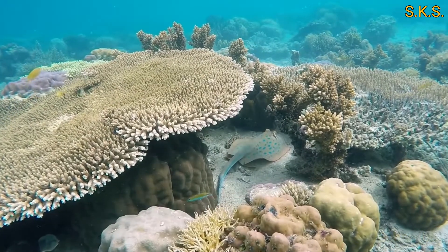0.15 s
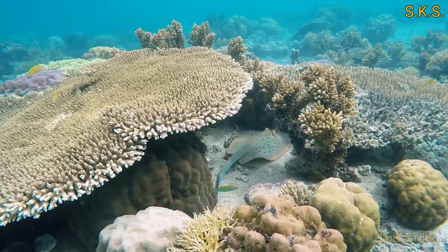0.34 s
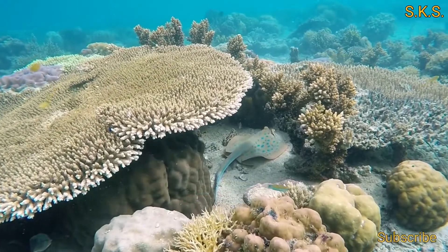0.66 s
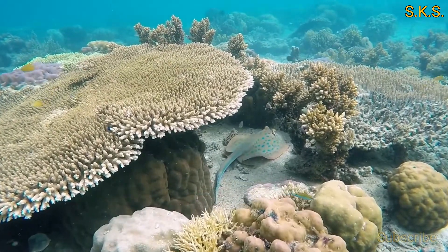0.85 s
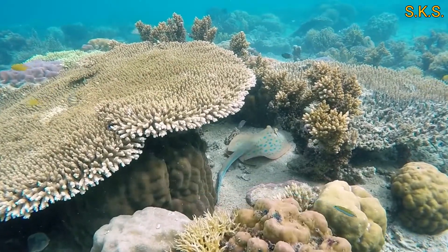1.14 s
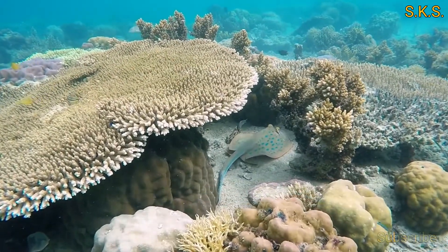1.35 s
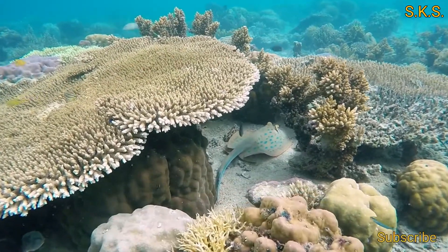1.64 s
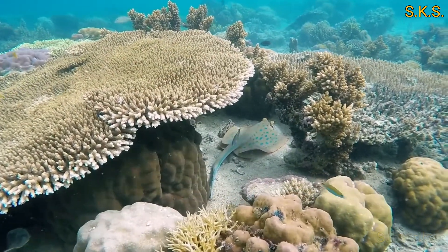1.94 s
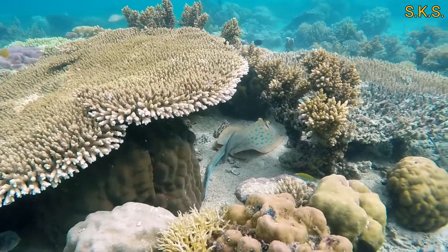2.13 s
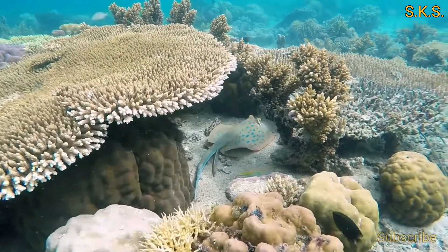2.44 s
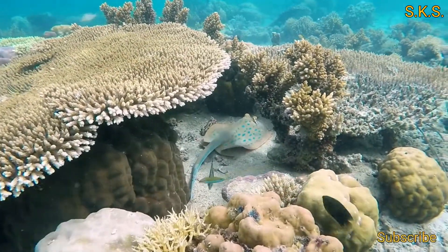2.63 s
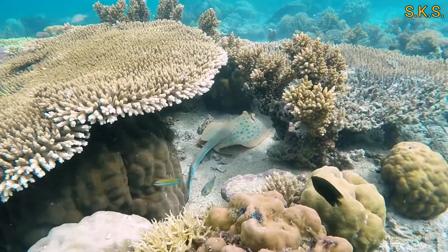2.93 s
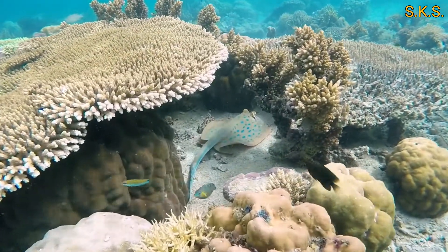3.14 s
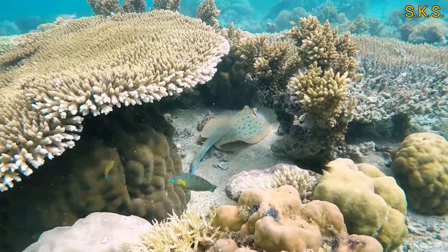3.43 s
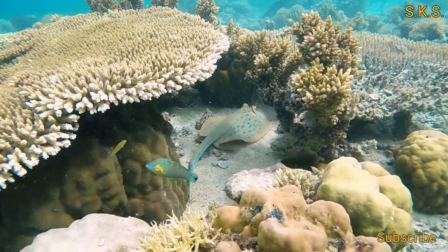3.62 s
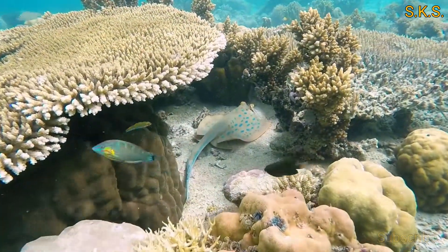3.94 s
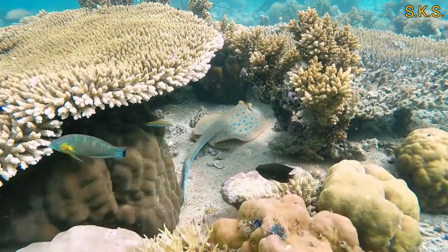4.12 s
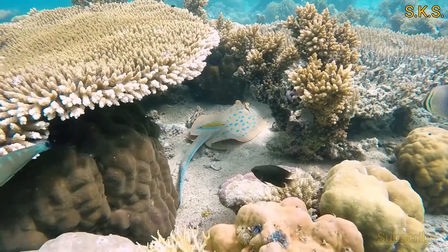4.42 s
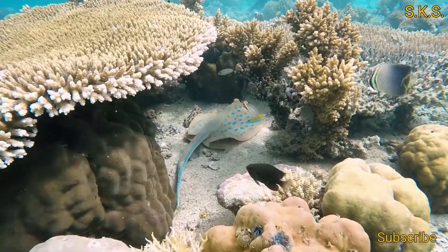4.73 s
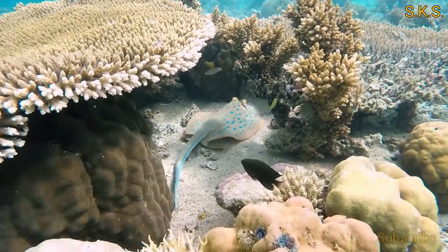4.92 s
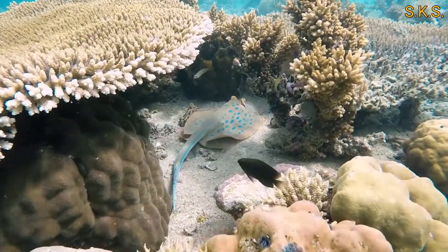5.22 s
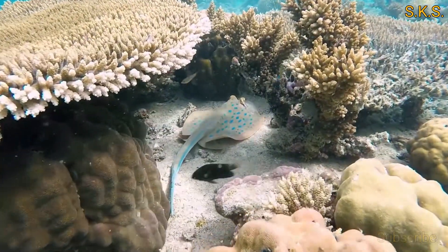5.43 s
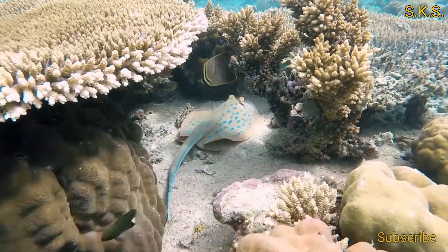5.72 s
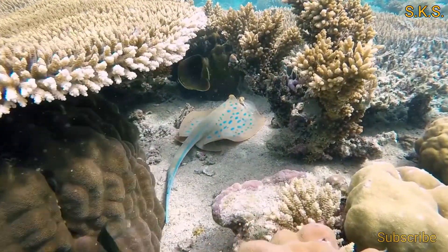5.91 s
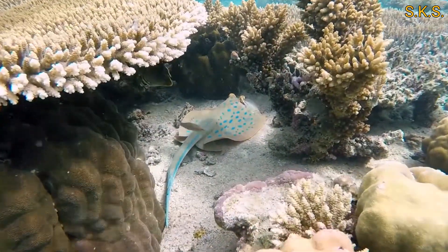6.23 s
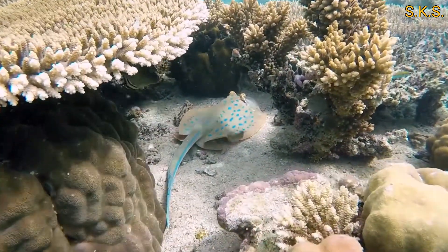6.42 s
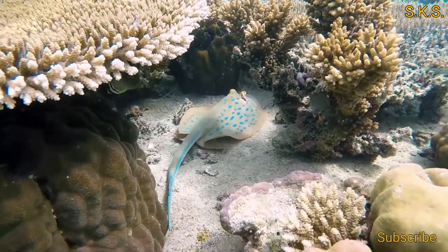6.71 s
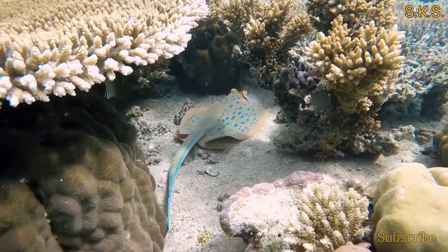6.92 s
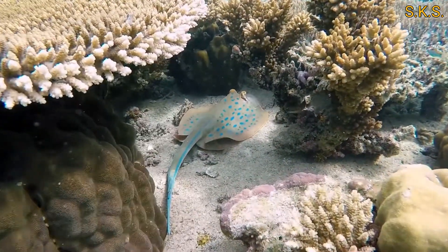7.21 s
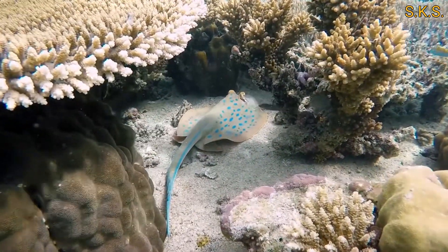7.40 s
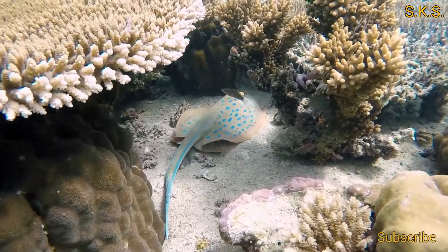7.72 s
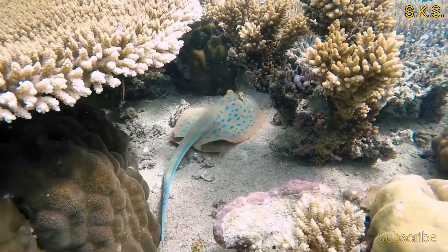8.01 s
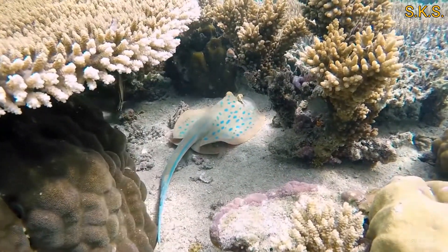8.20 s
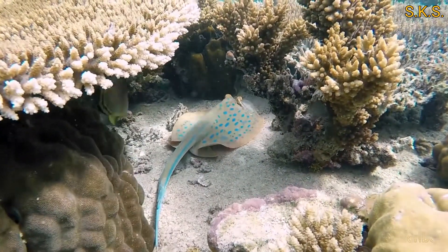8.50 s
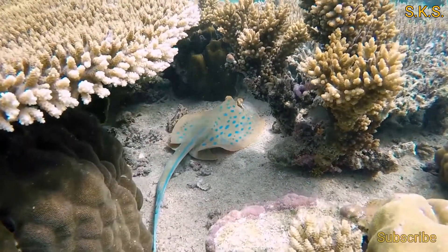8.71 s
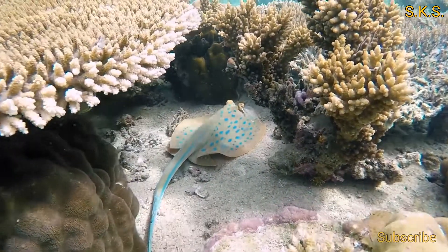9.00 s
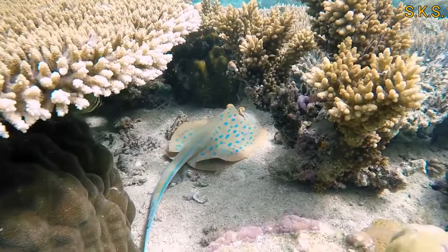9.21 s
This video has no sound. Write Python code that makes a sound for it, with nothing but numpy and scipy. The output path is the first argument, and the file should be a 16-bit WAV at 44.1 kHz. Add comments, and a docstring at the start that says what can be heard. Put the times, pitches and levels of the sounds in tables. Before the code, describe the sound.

Muffled underwater rumble with a few deep thumps, clusters of dull hollow taps, round bubble pops, and sharp dry snaps over faint crackling hiss.

```python
"""Water flows round a camera's watertight housing over a coral reef: filtered noise that surges, throbs and buffets.
It also thumps the case and shakes its mount, made from fading sine waves and random jolts.
Runs of hollow knocks ring the housing's modes, round pops are brief swelling tones, and flurries of bubbles
gurgle from random pulses. Sharp snaps, mostly shrimp, crackle as short shaped noise bursts over a faint hiss.
"""
import sys
import numpy as np
from scipy import signal
from scipy.fft import rfft, irfft, next_fast_len
from scipy.io import wavfile
from scipy.ndimage import uniform_filter1d

SR = 44100
rng = np.random.default_rng(int(sys.argv[2]) if len(sys.argv) > 2 else 0)


def master_out(mix):
    """Clip the mix to full scale and print it as 16-bit PCM to the path in sys.argv[1]."""
    frames = np.transpose(np.atleast_2d(mix))
    ceiling = np.clip(frames, -1, 1)
    pcm = np.round(ceiling * 32767).astype(np.int16)
    wavfile.write(sys.argv[1], SR, pcm)


N = 412335
T = np.arange(N) / SR  # time of every sample [s]

# Levels in the tables are relative: the functions trim many of them. A t60 is the time to fade by 60 dB.
# Water flowing round the case: (time [s], slow surge level [dB], throb level [dB])
WATER_FLOW = [(0.0, -37.5, -38), (0.5, -32.5, -34.5), (1.6, -25, -39.5), (1.8, -32.5, -43),
              (2.0, -23, -40.5), (2.7, -35.5, -43.5), (3.2, -31, -45.5), (3.4, -38.5, -35),
              (3.6, -37, -39.5), (4.7, -41, -41), (5.4, -35.5, -51.5), (5.7, -44.5, -44.5),
              (6.1, -45.5, -39), (6.4, -38, -47), (6.5, -37.5, -41.5), (7.8, -40.5, -48), (8.0, -41.5, -44),
              (9.35, -35.5, -46.5)]
# Tone of the slow surge: (frequency [Hz], level [dB])
SURGE_TONE = [(8, -26), (16, 6.5), (30, 2), (42, -6), (55, -17.5), (120, -34.5), (300, -69), (700, -140)]
# Tone of the throb of the case: (frequency [Hz], level [dB])
THROB_TONE = [(25, -29), (44, -2), (60, 1), (67, -4), (80, -22.5), (120, -26.5), (190, -41.5), (300, -63),
              (700, -140)]
# Slow thumps of water on the case:
# (time [s], pitch [Hz], level [dB], t60 [s], blow on the mount [dB], spray level [dB], spray length [s])
WATER_THUMPS = [(1.5, 55, -3.5, 0.18, -41.5, -35.5, 0.0075), (1.679, 51.7, -4, 0.11, -33.5, -41, 0.01),
                (1.976, 33, -5.5, 0.28, -27, -45, .035), (6.836, 33.8, -21.5, 0.38, -69, -74, .02)]
# What rings in the camera's mount: (frequency [Hz], level [dB], t60 [s])
MOUNT_MODES = [(96, 4.5, 0.17), (149.7, 3, 0.29), (171, -11.5, 0.32), (230, -10.5, 0.67)]
# Water jostles the camera and its mount shudders: (start [s], length [s], level [dB])
MOUNT_SHUDDERS = [(0.027, .44, -57), (1.74, .075, -42), (1.819, .16, -48.5), (1.978, .15, -44.5),
                  (2.15, .12, -43)]
# Hollow knocks: (time [s], level [dB], low modes compared with high modes [dB])
KNOCK_TIMES = [(0.367, -31.5, -2), (0.431, -39, -1), (.857, -36.5, 4), (1.03, -36, -3), (1.099, -33, 1),
               (1.4943, -21, -6), (1.6742, -18.5, -14), (2.1754, -27, -7), (2.2646, -27.5, -3.5),
               (2.312, -29, 4), (2.369, -25.5, 0), (2.385, -29.5, -3), (2.4291, -26.5, 2),
               (2.491, -33.5, 15), (2.534, -29.5, 4), (2.569, -21.5, 7), (2.6027, -21, -3.5),
               (2.659, -28.5, 5), (2.709, -26.5, 5), (2.7473, -22, -0.5), (2.879, -38, 3),
               (2.9274, -21.5, -1.5), (2.976, -29, 3), (2.987, -27.5, 1), (3.034, -18, 3),
               (3.082, -28.5, 7), (3.114, -27, 7), (3.1333, -17.5, -1), (3.176, -22, -5.5),
               (3.2414, -21, 5.5), (3.3643, -22.5, -0.5), (3.412, -25.5, 6), (3.452, -31, 2),
               (3.494, -26, -1), (3.626, -40, -11), (3.643, -29.5, -4), (3.711, -28.5, -6),
               (3.764, -33.5, 3), (3.818, -37, 4), (3.866, -43, 0), (3.984, -31, -9.5), (5.218, -29.5, 12),
               (5.3358, -31, -1), (5.351, -32, -7), (5.597, -38.5, -6), (5.6339, -29, 10), (5.8024, -18, 2),
               (5.8611, -27, -10), (5.894, -38, 5), (6.0003, -25.5, 7), (6.059, -28.5, 3),
               (6.108, -27.5, 6), (6.166, -24, 2.5), (6.215, -35, 11), (6.2888, -17.5, 7), (6.334, -23, 4),
               (6.396, -31.5, 6), (6.553, -24.5, -6.5), (6.581, -24, -0.5), (6.745, -32, 5),
               (6.8886, -25, 13), (6.9118, -24.5, -1), (7.0811, -31, 25), (7.0984, -32, 2),
               (8.3918, -29.5, 20), (8.8, -30, 4), (8.851, -30, 6), (8.897, -33.5, 6), (9.0791, -18.5, 5),
               (9.1217, -19.5, -1), (9.1719, -21, 5.5), (9.215, -23, 1), (9.246, -36, 4),
               (9.289, -31.5, -1), (9.339, -24.5, 0)]
# What a knock rings in the housing: (frequency [Hz], level [dB], t60 [s])
HOUSING_MODES = [(296, -5, 0.02), (401.3, 6, 0.023), (603.3, 2, 0.041), (729.5, -9.5, 0.027),
                 (1073, -7.5, 0.016), (1460, -15, 0.038), (2110, -8.5, 0.034)]
# Short round pops: (time [s], level [dB], pitch [Hz])
POP_TIMES = [(0.413, -38, 615), (4.054, -30.5, 630), (4.753, -34, 646), (4.785, -22.5, 620),
             (5.413, -33.5, 602), (5.549, -33, 605), (6.783, -29, 637), (7.341, -17, 588),
             (7.494, -39, 475), (7.578, -18.5, 594), (7.691, -40, 490), (7.968, -23, 614),
             (8.663, -28, 604), (9.008, -26.5, 610)]
# Flurries of small bubbles: (start [s], length [s], gurgle level [dB], rasp of the tiniest bubbles [dB])
BUBBLE_FLURRIES = [(0.006, 0.37, -50.5, -59.5), (1.446, 0.72, -47.5, -62), (4.775, 0.6, -43, -60.5),
                   (7.957, 0.59, -46, -63.5)]
# Gulps of larger bubbles: (time [s], level [dB], length [s], pitch [Hz])
BUBBLE_GULPS = [(0.179, -41, 0.011, 615), (1.435, -40, 0.018, 637), (1.458, -33.5, 0.025, 680),
                (1.732, -38.5, 0.013, 580), (1.758, -32.5, 0.018, 594), (4.787, -40, 0.013, 644),
                (4.793, -30.5, 0.024, 654), (4.9, -37, 0.023, 603), (4.979, -43, 0.013, 554),
                (5.013, -39, 0.032, 592), (5.133, -29, 0.023, 534), (5.158, -32.5, 0.018, 583),
                (5.256, -49, 0.024, 513), (7.976, -36.5, 0.025, 630), (8.101, -36.5, 0.0095, 600)]
# Tone of the larger bubbles: (frequency [Hz], level [dB])
BUBBLE_TONE = [(53, -54), (90, -16.5), (139, -10.5), (210, -7.5), (432, -7), (583, 0), (718, -15.5),
               (834, -15.5), (954, -52), (1190, -26), (1560, -29), (2480, -75), (7040, -110)]
# Tone of the spray of tiny bubbles: (frequency [Hz], level [dB])
SPRAY_TONE = [(400, -27), (900, 2.5), (1250, -7), (2080, -1), (2250, -16), (2500, -2), (3500, -16.5),
              (7000, -43), (15000, -70)]
# Resonances of the case that colour the bubbles: (frequency [Hz], width [Hz], added ring [dB])
CASE_RINGS = [(607, 43, -3), (1200, 48, 2.5), (1553, 70, 5), (2035, 125, 8)]
# Treble resonances of the case: (frequency [Hz], width [Hz], added ring [dB])
CASE_TREBLE_RINGS = [(2006, 156, 8.5), (2473, 265, 7), (5620, 300, 1.5), (8270, 310, -1.5)]
# Sharp close snaps, mostly shrimp, with a tick of spray after a thump and the edge of a pop:
# (time [s], level [dB], centre [Hz], bright crack compared with the body [dB])
CLOSE_SNAPS = [(.067, -31, 1810, -16), (.3506, -29.5, 4200, -11), (.413, -21.5, 1900, -25),
               (.436, -27.5, 3350, -23), (.7168, -29, 3300, -11), (.7835, -20.5, 3680, -9.5),
               (1.0327, -26, 2250, -34), (1.093, -26, 3050, -16), (1.3265, -27.5, 3180, -26),
               (1.409, -31, 2700, -23), (1.5923, -26.5, 3520, -27), (1.6793, -25.5, 2600, -53),
               (1.9496, -28, 2500, -33), (1.988, -26.5, 2680, -26), (2.249, -16, 3770, -24),
               (2.5232, -32, 4300, -4), (2.6743, -26.5, 2750, -20), (2.7, -30.5, 2600, -26),
               (2.741, -12, 4130, -10), (3.1135, -27, 2270, -10.5), (3.7329, -21.5, 3120, -18.5),
               (4.008, -22, 3180, -17), (4.0131, -25, 2500, -15), (4.2062, -30, 4200, -12),
               (4.2197, -28, 3850, -18), (4.2414, -23.5, 3600, -16), (4.3005, -35.5, 2710, -47),
               (4.7545, -20.5, 2100, -20), (4.992, -23, 4230, -13), (5.236, -31.5, 2520, -17),
               (5.4136, -28, 3250, -20), (5.4241, -26, 2590, -13.5), (5.7772, -29, 3820, -18),
               (5.9457, -22.5, 3170, -24), (6.3184, -32, 3520, -25), (6.4228, -32, 2190, -47),
               (6.5601, -30.5, 3200, -23), (6.5716, -32, 3650, -28), (6.6083, -29, 3430, -19),
               (6.6936, -31, 2950, -28), (6.7252, -27, 3100, -36), (6.7845, -38, 1550, -33),
               (6.8678, -34.5, 4270, -37), (7.4475, -27.5, 4200, -19), (7.5957, -23.5, 3130, -15),
               (7.6138, -22.5, 3500, -27), (7.7214, -29, 2980, -20), (7.9971, -29, 4000, -17),
               (8.1214, -27.5, 2700, -17), (8.1693, -34.5, 2560, -33), (8.2926, -26.5, 2930, -18),
               (8.3988, -20.5, 4000, -17), (8.4576, -23, 3220, -22), (8.535, -47, 3900, 10),
               (8.6737, -32, 3780, -13), (8.6889, -24.5, 3380, -15), (8.8026, -19.5, 4300, -19),
               (8.9301, -28, 4150, -25), (9.2738, -31.5, 3070, -37), (9.288, -25, 3200, -29)]
# Tone of the whole crackling reef: (frequency [Hz], level [dB])
REEF_TONE = [(600, -40), (1000, -12.5), (1500, -5), (1750, -20), (2000, -9.5), (2250, -9.5), (2550, -3),
             (3200, -4.5), (3900, 2), (5600, -6), (7100, -10.5), (10000, -10.5), (15000, -37)]
# Tone of the soft hiss: (frequency [Hz], level [dB])
HISS_TONE = [(88, -43.5), (150, 3), (381, -5.5), (607, 0.5), (985, -16.5), (1730, -16.5), (2020, -20),
             (2230, -29.5), (2500, -15), (3160, -14), (3910, -11.5), (5650, -17), (7130, -21), (13800, -27),
             (15500, -39)]

FLURRY_ATTACK_S, FLURRY_RELEASE_S = 0.0064, 0.21
GURGLE_HZ = 592  # the usual pitch of a gulp
TOP_HZ = 15300  # highest frequency the camera passes


def undb(db):
    """Turn decibels into a gain."""
    return 10 ** (np.asarray(db) / 20)


def unit(x):
    """Scale a sound so its average strength (rms) is 1."""
    return x / np.sqrt(np.mean(x ** 2) + 1e-18)


def add(out, s, x):
    """Mix x into out, starting at time s in seconds."""
    i = int(np.clip(s * SR, 0, N - 1))
    out[i:i + len(x)] += x[:N - i]


def colour(x, points, peaks=()):
    """Filter with a smooth (Hz, dB) outline and (Hz, width, dB) resonances; nothing sounds before its cause."""
    size = next_fast_len(len(x) + SR // 2, True) * 2
    f = np.arange(size // 2 + 1) * SR / size + 1e-3
    hz, db = np.transpose(points)
    gain = undb(np.interp(np.log(f), np.log(hz), db))
    gain = gain * (1 + sum(undb(d) / (1 + (2 * (f - c) / w) ** 2) for c, w, d in peaks))
    # folding the cepstrum gives the minimum-phase filter with this gain
    cepstrum = irfft(np.log(gain))
    cepstrum[1:size // 2] *= 2
    cepstrum[size // 2 + 1:] = 0
    response = np.exp(rfft(cepstrum))
    return irfft(rfft(x, size) * response)[:len(x)]


def strike(modes, length):
    """Ring a struck object: fading sine waves from (Hz, dB, t60) modes, over length seconds."""
    t = T[:int(length * SR)]
    return sum(undb(db) * np.sin(2 * np.pi * hz * t) * np.exp(-np.log(1000) * t / t60)
               for hz, db, t60 in modes)


def soften(x, hz, order=2):
    """Low-pass filter: a soft push in place of a sharp one."""
    return signal.sosfilt(signal.butter(order, min(hz, .45 * SR), fs=SR, output="sos"), x)


def sharpen(x, hz, order):
    """High-pass filter: take away the low part."""
    return signal.sosfilt(signal.butter(order, hz, "high", fs=SR, output="sos"), x)


def walk(rate):
    """Wander at random: a new level every 1 / rate seconds, smoothed twice, rms 1."""
    k = int(SR / rate)
    steps = np.repeat(rng.standard_normal(N // k + 1), k)
    smooth = uniform_filter1d(uniform_filter1d(steps, k), k)
    return unit(smooth[:N])


def patter(per_s, spread_db):
    """Scatter single pulses of either sign and varied size at random times, rms 1."""
    hits = rng.random(N) < per_s / SR
    signs = rng.choice([-1, 1], N)
    sizes = undb(spread_db * rng.standard_normal(N))
    return unit(hits * signs * sizes)


def many_small(size, spread_db, top_db):
    """Turn a chance of 0..1 into dB from 0 to top_db, small values far more common."""
    return -spread_db * np.log(1 - size * (1 - np.exp(-top_db / spread_db)))


def hiss(level_db=-60.2, waver_db=1.93, body_db=-75, stirred_db=-64, stir_s=0.24, sizzle_db=-75):
    """Distant crackle merges into a hiss; water keeps the housing's modes astir, most where knocks crowd."""
    far = unit(colour(rng.standard_normal(N), HISS_TONE, CASE_TREBLE_RINGS))
    far = far * undb(level_db + waver_db * walk(13))
    body = unit(signal.fftconvolve(rng.standard_normal(N), strike(HOUSING_MODES, .07))[:N])
    sizzle = undb(sizzle_db) * rng.standard_normal(N)
    crowd = np.sqrt(sum(np.maximum(1 - np.abs(T - s) / stir_s, 0) for s, _, _ in KNOCK_TIMES))
    stir = undb(body_db) + undb(stirred_db) * crowd / crowd.max()
    return far + sizzle + body * stir * undb(6.8 * walk(25))


def snap(noise, hz, octaves, crack_s, tail_s, tail_db, pulse=0, rise_s=0.00062):
    """A sharp noise burst, peak 1: a shock pulse if close, a crack round its pitch, then a scattered tail."""
    t = T[:len(noise)]
    fade = np.exp(-t / crack_s) + undb(tail_db) * np.exp(-t / tail_s)
    crack = noise * (1 - np.exp(-t / rise_s)) * fade
    crack[0] = pulse
    # band-pass round hz, octaves wide
    f = np.fft.rfftfreq(2 * len(t), 1 / SR) + 1
    off = 1j * (f / hz - hz / f) / (2 * np.sinh(np.log(2) * octaves / 2))
    x = irfft(rfft(crack, 2 * len(t)) / (1 + np.sqrt(2) * off + off ** 2))[:len(t)]
    return x / np.abs(x).max()


def thin_ticks(level_db=-60, spread_db=6, top_db=18, pitch_hz=9000, count=300):
    """The smallest shrimp add hair-thin ticks, high-pitched and at random times."""
    out = np.zeros(N)
    for noise, (when, size, pitch) in zip(rng.standard_normal((count, SR // 100)), rng.random((count, 3))):
        db = level_db + many_small(size, spread_db, top_db)
        hz = pitch_hz * 2 ** (pitch - .5)
        tick = snap(noise, hz, octaves=1.9, crack_s=0.00008, tail_s=0.0044, tail_db=-25.5)
        add(out, when * N / SR, undb(db) * tick)
    return out


def far_shrimp(level_db=-58.5, spread_db=12.5, top_db=20, centre_hz=4900, range_octaves=3.37,
               narrow_octaves=0.42, wide_octaves=2.3, answer_share=.35, answer_s=.016, count=1300):
    """The reef crackles: many faint snaps of varied pitch, width and length; some answer the last in clusters."""
    out, s = np.zeros(N), 0
    chances = rng.random((count, 6))
    for noise, chance in zip(rng.standard_normal((count, SR // 60)), chances):
        when, size, pitch, width, length, answer = chance
        s = s + when * answer_s if answer < answer_share else when * N / SR
        db = many_small(size, spread_db, top_db)
        hz = centre_hz * 2 ** (range_octaves * (pitch - .5))
        octaves = narrow_octaves * (1 - width) + wide_octaves * width
        crack_s = 0.00092 * 2 ** (2 * length - 1)
        add(out, s, undb(db) * snap(noise, hz, octaves, crack_s, tail_s=0.0043, tail_db=-5.5))
    return undb(level_db) * unit(colour(out, REEF_TONE, CASE_TREBLE_RINGS))


def neighbours(level_db=-41.0, range_db=9, centre_hz=3800, range_octaves=0.8, top_db=-20, count=66):
    """Shrimp a little further off snap at loose intervals: rows with the columns of CLOSE_SNAPS."""
    rows = []
    for k, (when, size, pitch, dullness) in enumerate(rng.random((count, 4))):
        s = (k + 2 * when - .5) * N / SR / count
        db = level_db + range_db * (size - .5)
        hz = centre_hz * 2 ** (range_octaves * (pitch - .5))
        rows.append((s, db, hz, top_db * (.5 + dullness)))
    return rows


def close_snaps(level_db=-3, low_hz=1300, high_hz=6400, crack_db=1, crack_hz=7500, ring_db=-7, shock_db=11,
                widest_octaves=2.62, narrowing_db=20):
    """Sharp snaps, mostly shrimp: a body the case rounds off and a thin bright crack; dull ones ring narrower."""
    body, crack = np.zeros(N), np.zeros(N)
    rows = list(CLOSE_SNAPS) + neighbours()
    for (s, db, hz, top_db), noise in zip(rows, rng.standard_normal((len(rows), 2, SR // 50))):
        octaves = widest_octaves * 2 ** (min(top_db, 0) / narrowing_db)
        round_snap = snap(noise[0], hz, octaves, crack_s=0.001, tail_s=0.004, tail_db=-11.5,
                          pulse=undb(shock_db))
        bright_snap = snap(noise[1], 7770, octaves=0.91, crack_s=0.00055, tail_s=0.0021, tail_db=-12,
                           pulse=1.47)
        add(body, s, undb(db + level_db) * round_snap)
        add(crack, s, undb(db + top_db + crack_db) * bright_snap)
    rings = [(hz, width, db + ring_db) for hz, width, db in CASE_TREBLE_RINGS]
    body = colour(body, [(low_hz / 3, -30), (low_hz, 0), (high_hz, 0)], rings)
    return soften(body, high_hz, order=6) + sharpen(crack, min(crack_hz, .4 * SR), order=2)


def swell(flurries, lumpy_db):
    """Shape the loudness of flurries: each rises, holds and fades in lumps."""
    shape = 0
    for s, length, db in flurries:
        rise, fade = (T - s) / FLURRY_ATTACK_S, (s + length - T) / FLURRY_RELEASE_S
        shape = shape + undb(db) * np.clip(np.minimum(rise, fade), 0, 1)
    return shape * undb(lumpy_db * walk(45))


def burst(births, s, length, db):
    """Cut out a short stretch of patter and give it its own level."""
    return undb(db) * unit(births[int(s * SR):int((s + length) * SR)])


def ring_case(push, outline):
    """Bubble pulses take their tone from the outline and ring the case."""
    body = colour(signal.unit_impulse(SR // 10), outline, CASE_RINGS)
    return signal.fftconvolve(push, body / np.linalg.norm(body))[:len(push)]


def bubbles(gulp_spray_db=-21.5, spray_growth=0.9, full_db=-30, spray_lead_s=.004, gulp_db=1.45):
    """Bubbles pinch off and gurgle, each gulp at its own pitch; gulps and thumps also throw a gritty spray."""
    starts, lengths, gurgle_db, rasp_db = np.transpose(BUBBLE_FLURRIES)
    large, tiny = patter(per_s=1300, spread_db=3.0), patter(per_s=900, spread_db=1.5)
    gurgle = ring_case(large * swell(zip(starts, lengths, gurgle_db), lumpy_db=2.0), BUBBLE_TONE)
    spray = tiny * swell(zip(starts, lengths, rasp_db), lumpy_db=-2.0)
    for s, db, length, pitch in BUBBLE_GULPS:
        # only the lower part of the tone moves with the gulp's pitch
        outline = sorted((hz * (pitch / GURGLE_HZ if hz < 1.5 * GURGLE_HZ else 1), d) for hz, d in BUBBLE_TONE)
        gulp = np.pad(burst(large, s, length, db + gulp_db), (0, SR // 10))
        add(gurgle, s, ring_case(gulp, outline))
        spray_db = full_db + gulp_spray_db + spray_growth * (db - full_db)
        add(spray, s, burst(tiny, s, length, spray_db))
    for s, *_, db, length in WATER_THUMPS:
        add(spray, s - spray_lead_s, burst(large, s, length, db))
    return gurgle + ring_case(spray, SPRAY_TONE)


def reef_echo(x, wet_db, t60):
    """Coral and the surface scatter a faint tail back: fading noise is blended in."""
    t = T[:SR // 2]
    tail = rng.standard_normal(len(t)) * np.exp(-np.log(1000) * t / t60)
    return x + undb(wet_db) * signal.fftconvolve(x, tail / np.linalg.norm(tail))[:N]


def knock(low_db, chance, wall_hz=800, low_cut_hz=215, split_hz=500, lean=0.99, detune=0.031, scatter_db=3.0,
          leak_db=-18, leak_lean=0.47, rise_s=0.00088):
    """One soft blow on the housing, peak 1; it leans on the lower or the upper modes."""
    modes = []
    for (hz, d, t60), (a, b) in zip(HOUSING_MODES, chance):
        mode_db = d + scatter_db * b + lean * low_db * (hz < split_hz)
        modes.append((hz * (1 + detune * a), mode_db, t60))
    blow = strike(modes, .08)
    blow = blow * (1 - np.exp(-T[:len(blow)] / rise_s))
    blow = sharpen(blow, low_cut_hz, order=4)
    # the wall muffles steeply; only a trace of the upper modes leaks through
    band = signal.butter(3, [1.39 * wall_hz, 3.1 * wall_hz], "band", fs=SR, output="sos")
    leak = undb(leak_db - leak_lean * low_db) * signal.sosfilt(band, blow)
    x = soften(blow, wall_hz, order=10) + leak
    return x / np.abs(x).max()


def pops(level_db=-1.0, length_s=0.013, early=0.39, knock_db=-14):
    """A few cycles of a tone that swell quickly and stop, barely ringing the housing."""
    out, t = np.zeros(N), T[:int(length_s * SR)]
    rise_and_stop = np.sin(np.pi * (t / length_s) ** early) ** 2
    for (s, db, hz), chance in zip(POP_TIMES, rng.standard_normal((len(POP_TIMES), len(HOUSING_MODES), 2))):
        add(out, s, undb(db + level_db) * rise_and_stop * np.sin(2 * np.pi * hz * t))
        add(out, s, undb(db + knock_db) * knock(0, chance, leak_db=-7))
    return out


def knocks(level_db=-2.5, lead_s=0.001395, faint_db=-42, faint_spread_db=3, faint_within_s=.07,
           bounce_s=0.0063, bounce_db=-19, bounce_lean=1.0, bounce_spread_db=3,
           grit_db=-30.5, grit_spread_db=4, grit_hz=1350):
    """Each knock lands with a little grit and bounces once, bright ones most; fainter ones fall between."""
    out, count = np.zeros(N), len(KNOCK_TIMES)
    noises = rng.standard_normal((count, SR // 40))
    chances = rng.standard_normal((count, 4, len(HOUSING_MODES), 2))
    for (s, db, low_db), noise, (main, bounce, faint, free) in zip(KNOCK_TIMES, noises, chances):
        (delay, size), (lean, gap), (rebound, rough), (pitch, _) = free[:4]
        add(out, s - lead_s, undb(db + level_db) * knock(low_db, main))

        rebound_db = min(bounce_db - bounce_lean * low_db + bounce_spread_db * rebound, -8)
        rebound_s = s + bounce_s * 2 ** (0.395 * gap)
        add(out, rebound_s, undb(db + rebound_db) * knock(low_db, bounce))

        hz = grit_hz * 2 ** (.2 * pitch)
        grit = snap(noise, hz, octaves=0.73, crack_s=0.0039, tail_s=0.01, tail_db=4)
        add(out, s, undb(db + grit_db - .5 * max(low_db, 0) + grit_spread_db * rough) * grit)

        add(out, s + faint_within_s * delay, undb(faint_db + faint_spread_db * size) * knock(6 * lean, faint))
    return out


def shudder(jolts_per_s=110, spread_db=4, damping=0.23, tilt_db=14, reference_hz=150):
    """Small irregular jolts keep the mount's modes rumbling, their ringing shortened by the water."""
    gate = sum(undb(db) * (T > s) * (T < s + length) for s, length, db in MOUNT_SHUDDERS)
    # tilt_db per octave favours the higher modes
    modes = [(hz, db + tilt_db * np.log2(hz / reference_hz), damping * t60) for hz, db, t60 in MOUNT_MODES]
    ring = strike(modes, .3)
    jolts = patter(jolts_per_s, spread_db) * gate * undb(6.6 * walk(22.02))
    return soften(signal.fftconvolve(jolts, ring / np.linalg.norm(ring))[:N], 350, order=4)


def thumps(soft_hz=170, mount_soft_hz=400, rise_s=0.0056):
    """Heavy pushes of water build up, swing the case for a few cycles and set its mount humming."""
    swing, hum = np.zeros(N), np.zeros(N)
    for s, hz, db, t60, mount_db, *_ in WATER_THUMPS:
        build_up = 1 - np.exp(-T[:SR] / rise_s)
        add(swing, s, -strike([(hz, db, t60)], 1) * build_up)
        add(hum, s, undb(mount_db) * strike(MOUNT_MODES, 0.9))
    return soften(swing, soft_hz) + soften(hum, mount_soft_hz)


def flow(surge_db=1, throb_db=0, full_db=-29, steady_s=0.155, buffet_db=-25.5, buffet_hz=100, growth=1.3,
         waver_db=2.5):
    """Eddies press on the case: a deep surge and a throb; faster water adds small eddies that buffet higher up."""
    s, *levels = np.transpose(WATER_FLOW)
    slow_db, fast_db = (np.interp(T, s, db) for db in levels)
    buffet = unit(soften(rng.standard_normal(N), buffet_hz, order=4))
    out = buffet * undb(full_db + buffet_db + growth * (slow_db - full_db))
    for outline, db in (SURGE_TONE, slow_db + surge_db), (THROB_TONE, fast_db + throb_db):
        eddies = colour(rng.standard_normal(N), outline)
        # even out the noise so that it follows the level in the table
        strength = np.sqrt(uniform_filter1d(eddies ** 2, int(steady_s * SR)) + 1e-18)
        out = out + undb(db + waver_db * walk(7.8)) * eddies / strength
    return out


def scene():
    """Everything reaches the one microphone through the case."""
    snaps = close_snaps() + far_shrimp() + thin_ticks()
    taps = reef_echo(knocks(), wet_db=-24.5, t60=0.37) + reef_echo(pops(), wet_db=-32, t60=0.27)
    return (flow() + thumps() + shudder() + taps + bubbles() + snaps + hiss())[None]


def record(dry):
    """The camera cuts the top: a steep low-pass filter."""
    return signal.sosfilt(signal.ellip(8, .2, 70, TOP_HZ, fs=SR, output="sos"), dry)


dry = scene()
out = record(dry)
master_out(out)
```